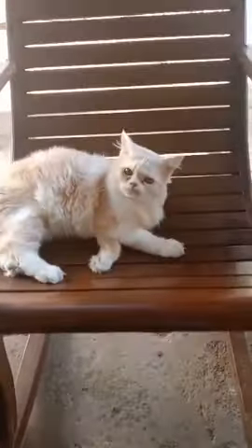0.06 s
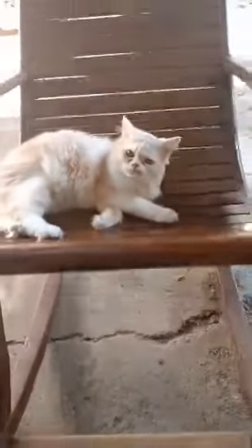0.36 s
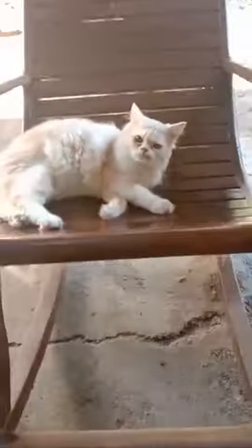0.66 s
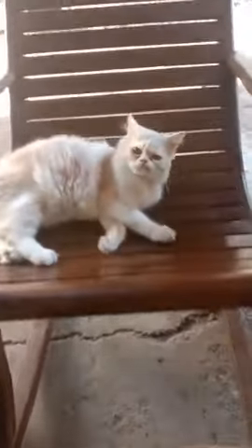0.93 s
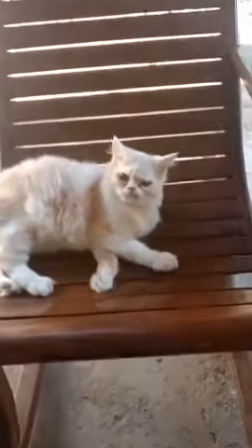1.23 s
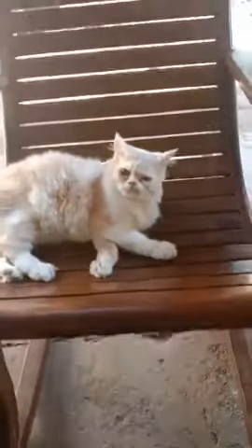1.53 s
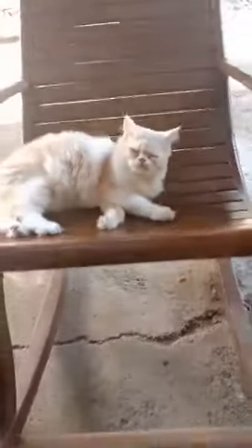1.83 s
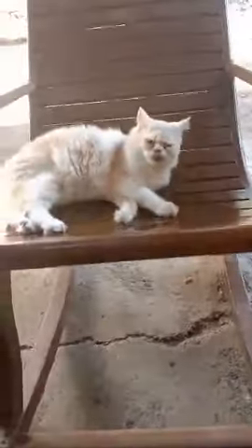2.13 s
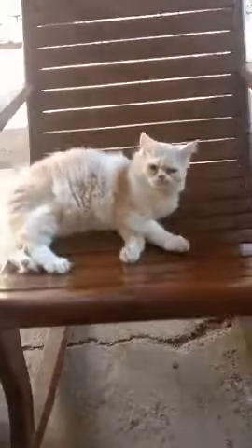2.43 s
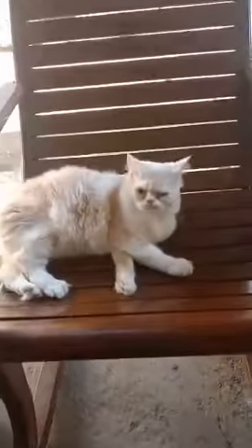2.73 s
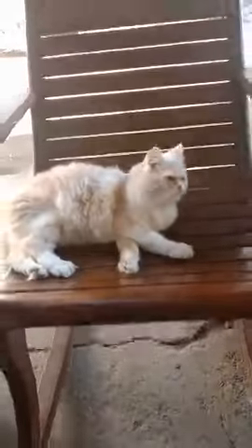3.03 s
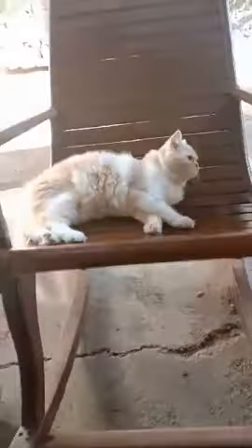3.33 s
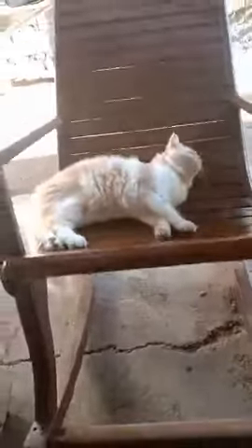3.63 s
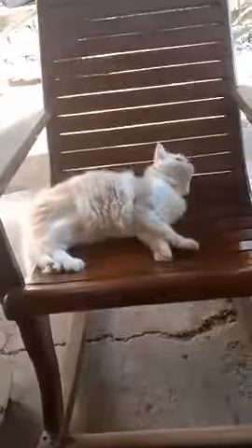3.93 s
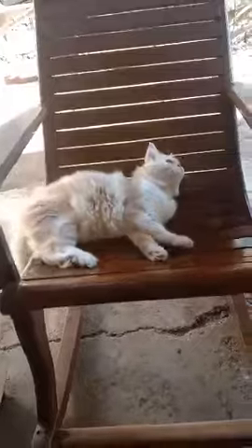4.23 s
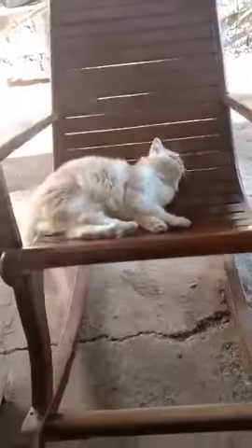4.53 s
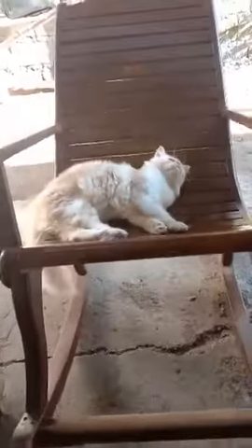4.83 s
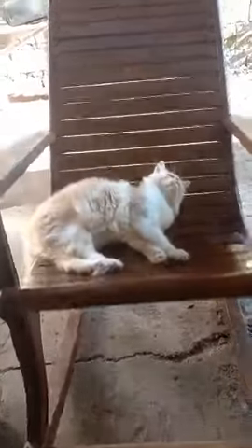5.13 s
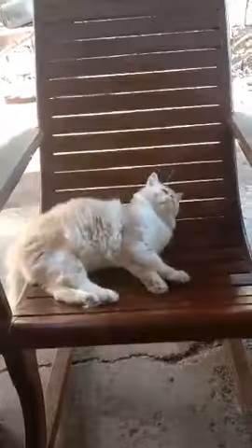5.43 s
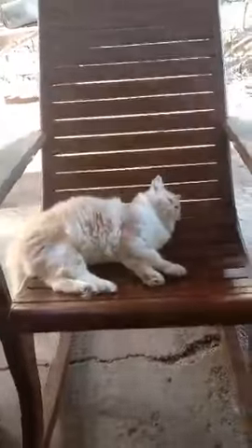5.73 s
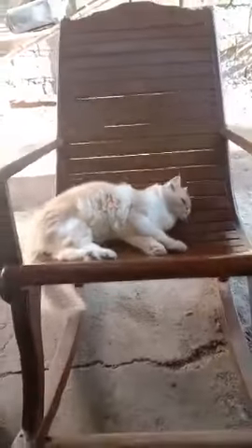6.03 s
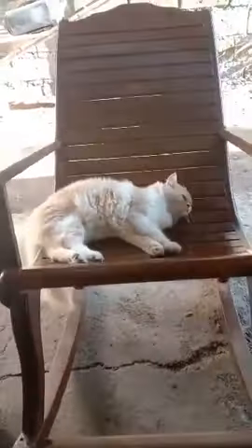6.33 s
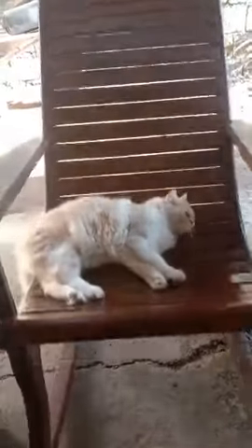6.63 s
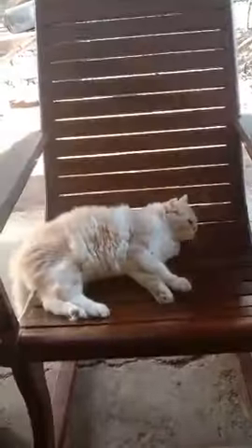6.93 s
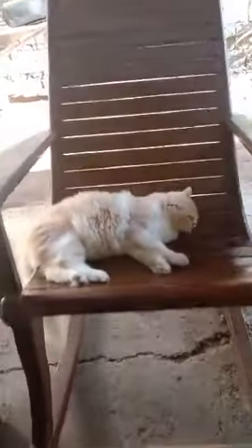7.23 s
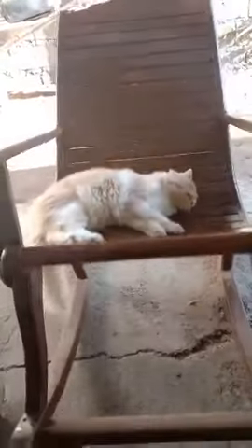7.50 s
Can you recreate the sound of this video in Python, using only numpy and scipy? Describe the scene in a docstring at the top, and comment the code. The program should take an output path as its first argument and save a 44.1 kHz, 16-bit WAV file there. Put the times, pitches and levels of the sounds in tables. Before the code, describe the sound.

A wooden rocking chair thumps and grinds softly on gritty concrete in a slow rhythm, while a small bird repeats a high falling chirp.

```python
"""A wooden rocking chair rocks close by on a gritty concrete porch, over a quiet outdoor hiss.
It swings out first: the runners tip over a flat spot, the frame thumps and sand grinds or cracks.
Then it rolls softly back. Among the six swings out, a high falling chirp, probably a small bird,
rings under the roof six times: four just before a thump, two shortly after one.
Faint tones come and go far behind, and toward the end a dry joint gives its two clearest creaks."""
import sys
import numpy as np
from scipy import signal
from scipy.fft import rfft, irfft, next_fast_len
from scipy.io import wavfile
from scipy.ndimage import map_coordinates

SR = 44100
rng = np.random.default_rng(int(sys.argv[2]) if len(sys.argv) > 2 else 0)


def wav_out(sig):
    """Save sig, one row per channel (or a flat mono array), as 16-bit PCM at SR to the path in sys.argv[1]."""
    wavfile.write(sys.argv[1], SR, np.round(np.clip(np.atleast_2d(sig).T, -1, 1) * 32767).astype(np.int16))


N = 342216
TREBLE_LIMIT_HZ = 13200

# Levels in the tables are relative: each function sets its own overall loudness.
# swings out: t/s, thump/dB, hardness/dB, grinding before, at and after the flat spot/dB
OUT_SWINGS = [(0.289, -32.5, -25, -15, -11.5, 3.5), (1.741, -26.5, -3, -3.5, -6, 3.5),
              (3.161, -23.5, -5, -7, 8, -2.5), (4.477, -35.5, -12, -18, 0.5, -2),
              (5.922, -25.5, -2.5, -9, 6.5, -8), (7.347, -26.5, -11.5, 2.5, -7.5, 1)]
# swings back: t/s, bump/dB, grinding before, at and after the flat spot/dB
BACK_SWINGS = [(1.045, -43, -1.5, -17, 2), (2.507, -44, -6, 5, -3), (3.958, -41, -11, 6, -12),
               (5.283, -47.5, -6, 7.5, 0.5), (6.663, -45, -10, -5, 3.5)]
# the frame's own notes: f/Hz, level/dB, time to fade by 60 dB/s
FRAME_NOTES = [(82.6, -5, 0.16), (125.7, -19, 0.42), (177.3, 0.5, 0.1), (190, 4, 0.085), (249, -2.5, 0.049),
               (335, -15, 0.3), (387, -36.5, 0.056), (480, -20, 0.21), (591, -20.5, 0.16),
               (690, -2.5, 0.053), (753.3, -6, 0.056), (835, -3.5, 0.047), (933, -18, 0.015),
               (1140, -6, 0.055), (1192, -19.5, 0.029)]
# sandy patches, out and back: t from the flat spot/s, rise/s, fall/s, level/dB, lows/dB, highs/dB
OUT_PATCHES = [(-0.033, 0.024, 0.099, -44, -7, -11.5), (0.035, 0.013, 0.1, -48, 1.5, -9.5),
               (0.133, 0.026, 0.08, -47.5, -4, -5.5)]
BACK_PATCHES = [(-0.1, 0.01, 0.094, -45.5, -2.5, -9), (-0.014, 0.034, 0.061, -46.5, -4.5, -11),
                (0.058, 0.021, 0.06, -47, -6, -5), (0.206, 0.022, 0.081, -43, -9, -7),
                (0.263, 0.022, 0.055, -53, -9.5, -10), (0.382, 0.039, 0.014, -67, -4.5, -6)]
# single short scratchy noises (at 0.787 and 4.85 s with a chirp): t/s, rise/s, fall/s, level/dB
SCRATCHES = [(0.608, 0.021, 0.15, -54.5), (0.787, 0.003, 0.12, -47.5), (1.111, 0.005, 0.077, -46),
             (2.053, 0.0027, 0.034, -57.5), (1.439, 0.0071, 0.025, -53), (2.096, 0.025, 0.042, -54.5),
             (2.263, 0.0091, 0.038, -67), (2.446, 0.01, 0.13, -67), (3.419, 0.0048, 0.022, -57.5),
             (3.53, 0.014, 0.017, -62.5), (3.885, 0.0036, 0.087, -45), (4.211, 0.031, 0.095, -53),
             (4.409, 0.031, 0.023, -57.5), (4.85, 0.021, 0.16, -47.5), (5.579, 0.025, 0.11, -52.5),
             (6.406, 0.004, 0.082, -55.5), (6.77, 0.013, 0.087, -57), (7.615, 0.061, 0.089, -44)]
# bursting grains: t/s, level/dB, highs/dB
GRAIN_CRACKS = [(0.4123, -38.5, -3.5), (1.004, -20, -24), (1.052, -22, -18), (1.0593, -35.5, -1),
                (1.8646, -24, -16.5), (2.4415, -8, -29.5), (2.4769, -20, -23.5), (3.2817, -23, -25.5),
                (3.881, -9, -26), (3.969, -22.5, -16.5), (5.2057, -18, -26.5), (5.247, -26, -24),
                (5.2688, -18, -25.5), (5.3006, -15.5, -21), (6.6305, -30.5, -16.5)]
# creaks of a joint: t/s, length/s, first f/Hz, last f/Hz, level/dB
JOINT_CREAKS = [(1.143, 0.014, 1700, 1663, -63), (1.476, 0.049, 810, 745, -88),
                (4.2, 0.046, 1013, 1010, -63.5), (5.478, 0.05, 1164, 1079, -49.5),
                (6.926, 0.042, 3400, 2760, -44)]
# chirps: t/s, level/dB, pitch factor, length factor
BIRD_CHIRPS = [(0.704, -32, 1.03, 0.86), (1.608, -39, 1, 0.92), (3.048, -33.5, 1.0, 1.084),
               (4.82, -32, 1.02, 1.013), (5.813, -33.5, 1.018, 1.01), (7.166, -31.5, 1.033, 1.08)]
# background tones: t/s, length/s, first f/Hz, last f/Hz, width/Hz, level/dB
FAINT_TONES = [(0.421, 0.28, 1172, 1050, 80, -75), (1.968, 0.074, 355, 297, 40, -75),
               (1.969, 0.091, 3320, 3280, 390, -68.5), (2.172, 0.11, 3530, 3270, 150, -72),
               (2.568, 0.057, 3440, 3250, 460, -55), (2.89, 0.041, 348, 308, 23, -76.5),
               (2.923, 0.05, 840, 768, 50, -74), (3.114, 0.025, 557, 566, 60, -54.5),
               (3.515, 0.63, 5260, 5160, 350, -71.5), (3.533, 0.72, 755, 790, 200, -76),
               (3.565, 0.059, 560, 564, 64, -70.5), (3.71, 0.25, 480, 260, 70, -74.5),
               (4.152, 0.13, 410, 452, 44.6, -70.5), (5.049, 0.62, 1106, 988, 130, -66.5),
               (5.382, 0.038, 535, 584, 62, -65), (5.622, 0.044, 365, 312, 33, -70),
               (6.035, 0.061, 312, 338, 19.3, -69), (6.056, 0.33, 857, 860, 84, -78),
               (6.293, 0.18, 1645, 1718, 173, -71.5), (7.034, 0.11, 1730, 1564, 150, -68.5),
               (7.098, 0.55, 1157, 1021, 130, -65.5)]
# loudness of the hiss: t/s, level/dB
HISS_LEVELS = [(0, 10.5), (0.198, -2), (0.8, 3), (1.55, -5.5), (2.05, 0), (2.329, 0), (3.05, -5), (3.65, 6),
               (4.4, 0), (5.101, 5.5), (5.75, -1.5), (6.5, -0.5), (6.999, 4)]
# echo of the porch: f/Hz, time to fade by 60 dB/s
PORCH_FADE = [(100, 0.32), (400, 0.36), (1200, 0.21), (5000, 0.093), (12000, 0.054)]
# tone colours, the strong and weak pitches of each sound: f/Hz, level/dB
ROLL_COLOUR = [(30, -23.5), (85, 18.5), (125, -8.5), (200, -1), (300, 4.5), (430, -12), (700, -19.5),
               (1200, -6), (2500, -36)]
GRIND_COLOUR = [(100, -0.5), (500, -16), (800, 1.5), (1200, 6.5), (2000, 5), (3300, -2), (5400, 4.5),
                (6500, -2.5), (8000, -5.5), (10500, -16.5), (12500, -13), (14000, -22)]
CRACK_COLOUR = [(100, -19), (800, -26), (1300, -3.5), (2200, -15), (3200, -5.5), (5000, -3), (7000, 5.5),
                (9000, 1.5), (13000, -6.5)]
CHIRP_COLOUR = [(3000, -10), (3700, -7), (4200, -7.5), (4700, 2), (5200, -3.5), (5900, 3.5), (6350, -16),
                (6800, -21.5), (8000, -3), (10000, -10)]
HISS_COLOUR = [(30, -22), (90, -8), (250, -17.5), (500, -7), (850, -8), (1600, -9.5), (2600, -13),
               (4000, -18.5), (5300, -8), (7000, -20.5), (9500, -14), (12000, -38.5)]
FLICKER_COLOUR = [(2400, -70), (3400, -32), (4200, -18), (6000, -12), (8000, -9), (13000, -11)]
RATTLE_COLOUR = [(30, -10), (90, -29), (180, -6), (330, 8.5), (1150, 6.5), (1600, -10), (4000, -30.5)]
RASP_COLOUR = [(500, 3), (1000, 2), (1800, 2.5), (3000, -9), (8000, 13), (10000, -0.5), (13000, -9.5)]
RUMBLE_COLOUR = [(30, -40.5), (60, -9.5), (88, 9), (130, -8.5), (200, -8), (330, -15), (600, -53),
                 (2000, -53.5)]
FRAME_COLOUR = [(30, -13), (60, -5), (110, 2)]  # so small a frame gives off little deep bass


def thumps(rattle_db=-12, rattle_fade_s=0.25, rise_s=0.011):
    """A runner tips over a flat spot: the frame rings and its joints rattle briefly."""
    out, t = np.zeros(N), np.arange(SR // 2) / SR
    hz, note_db, fade_s = np.transpose(FRAME_NOTES)[:, :, None]
    for start, db, hardness, *_ in OUT_SWINGS:
        detune, uneven_db, phase = rng.standard_normal((3, len(FRAME_NOTES), 1))
        bright_db = np.interp(hz, [250, 650], [0, 1]) * (hardness + 6)  # hard blows sound brighter
        waves = np.sin(2 * np.pi * (hz * (1 + 0.012 * detune) * t + phase))
        notes = waves * gain(note_db + bright_db + uneven_db - 60 * t / fade_s)
        rattle = noise(len(t), RATTLE_COLOUR) * gain(rattle_db - 60 * t / rattle_fade_s)
        blow = (notes.sum(0) + rattle) * (1 - np.exp(-t / rise_s))
        add(out, start, gain(db - 9) * blow / blow[:SR // 25].std())
    return out


def rolls(rise_s=0.019):
    """Swinging back, the runners bump gently over the uneven floor: a dull woody murmur."""
    out, t = np.zeros(N), np.arange(SR // 4) / SR
    swell = t / rise_s * np.exp(1 - t / rise_s)
    for start, db, *_ in BACK_SWINGS:
        add(out, start, gain(db) * noise(len(t), ROLL_COLOUR) * swell)
    return out


def scrapes(grains_per_s=1550, spread_db=4):
    """Sand under a runner makes tiny slips that ring in the wood; the single scratches sound alike."""
    out, t = np.zeros(N), np.arange(SR // 3) / SR
    for start, rise, fall, db, lows, highs in scrape_list():
        signs = rng.choice([-1, 1], len(t))
        sizes = gain(spread_db * np.minimum(rng.exponential(1, len(t)), 4))
        slipping = rng.random(len(t)) < grains_per_s / SR
        pressure = gain(np.where(t < rise, -11 * (1 - t / rise), -24 * (t - rise) / fall))
        pressure *= np.minimum(t / 0.005, 1)
        slips = normalise(signs * sizes * slipping) * pressure
        wood = rolling_contact(signal.fftconvolve(slips, wood_ring(fade_s=0.025)))
        tilt = [(2200, lows + 2), (3200, 0.037), (6300, 0.064), (7800, highs + 5)]
        add(out, start, gain(db + 8.5) * colour(wood, tilt))
    return colour(out, GRIND_COLOUR)


def scrape_list(scratch_lows_db=-5.5, scratch_highs_db=-5.5):
    """Lists the single scratches, then the sand each swing crosses, pressed by the shifting weight."""
    rows = [(*row, scratch_lows_db, scratch_highs_db) for row in SCRATCHES]
    for swings, patches in (OUT_SWINGS, OUT_PATCHES), (BACK_SWINGS, BACK_PATCHES):
        for start, *_, before, at, after in swings:
            for delay, rise, fall, db, lows, highs in patches:
                weight_db = np.interp(delay, [-0.017, 0, 0.14], [before, at, after])
                rows.append((start + delay, rise, fall, db + weight_db, lows, highs))
    return rows


def rolling_contact(x, ripple_db=5, spacing_hz=170, sink_per_s=0.35):
    """Each spot on a runner favours its own pitches, which sink as the touching point moves along."""
    hz, t = np.arange(0, SR / 2, spacing_hz), np.arange(len(x)) / SR
    peaks = normalise(gain(ripple_db * np.clip(rng.standard_normal(512)[:len(hz)], -2, 2)))
    wood = colour(x, np.c_[hz, 20 * np.log10(peaks)])
    slowing_time = t - sink_per_s * t ** 2 / 2
    return map_coordinates(wood, [SR * slowing_time], order=3)


def wood_ring(fade_s, size=4096):
    """Struck wood rings at so many pitches at once that it sounds like fading noise."""
    ring = rng.standard_normal(size) * gain(-60 * np.arange(size) / SR / fade_s)
    return ring / np.linalg.norm(ring)


def cracks():
    """A larger grain bursts: a hard snap and a short ring of the runner."""
    out = np.zeros(N)
    for start, db, highs in GRAIN_CRACKS:
        snap = wood_ring(fade_s=0.035) + gain(-6) * wood_ring(fade_s=0.29)
        add(out, start, gain(db + 14) * colour(snap, [(4500, 0.022), (8500, highs + 6)]))
    return colour(out, CRACK_COLOUR)


def creaks():
    """A dry joint sticks and slips almost regularly, making a short note rich in overtones."""
    out = np.zeros(N)
    for start, length, first_hz, last_hz, db in JOINT_CREAKS:
        size = int(length * SR)
        hz = np.linspace(first_hz, last_hz, size) * (1 + 0.014 * wobble(size, 900))
        phase = 2 * np.pi * np.cumsum(hz) / SR
        slips = sum(np.cos(k * phase) for k in range(1, int(TREBLE_LIMIT_HZ / first_hz) + 1))
        wood = normalise(colour(slips, GRIND_COLOUR))
        add(out, start, gain(db) * wood * signal.windows.tukey(size, 0.8))
    return out


def chirps(ring_hz=4780, ring_rise_s=0.044, ring_fade_s=0.19):
    """Two voices fall together and leave a blurred ring; a faint rasp sounds with them."""
    out, hush = np.zeros((2, N))
    t = np.arange(SR // 3) / SR
    ring_shape = np.minimum(t / ring_rise_s, 1)
    ring_shape *= gain(-4 - 60 * np.maximum(t - ring_rise_s, 0) / ring_fade_s)
    for start, db, pitch, stretch in BIRD_CHIRPS:
        call, top_hz = np.zeros(N), pitch * 8584
        upper = whistle(top_hz, stretch, hold=0.048)
        lower = whistle(0.81 * top_hz, stretch, hold=0.004)
        add(call, 0, upper + gain(-5.5) * lower)
        add(call, 0.06 * stretch, ring_shape * blurred(pitch * ring_hz * t, width_hz=670))
        # each call takes its own paths under the roof
        call = colour(porch(call, echo_db=3)[:SR], CHIRP_COLOUR)
        add(out, start, gain(db) * call / call[:SR // 7].std())
        # each chirp ends in a soft band of noise that falls in pitch
        add(hush, start + 0.145, gain(db - 23) * fuzzy_glide(0.13, 3800, 2200, width_hz=1000))
    rasp = colour(out * rng.standard_normal(N), RASP_COLOUR)
    return out + gain(-30) * rasp + hush


def whistle(top_hz, stretch, hold, rise=0.036, fall_rate=13, hoarseness=0.045):
    """One hoarse tone falls steadily as it swells, holds and dies; a larger stretch slows it all."""
    t = np.arange(SR // 5) / SR / stretch
    hz = top_hz * 2 ** (-fall_rate * t) * (1 + hoarseness * wobble(len(t), 1500))
    shape_db = -1095.5 * np.maximum(rise - t, 0) - 601 * np.maximum(t - rise - hold, 0)
    flutter_db = wobble(len(t), 500)
    return gain(shape_db - flutter_db) * np.sin(2 * np.pi * np.cumsum(hz) / SR)


def porch(x, echo_db, gap_s=0.004):
    """Adds the many echoes from floor, walls and roof; the high pitches die first."""
    echoes = rng.standard_normal(SR) * (rng.random(SR) < 0.12) * (np.arange(SR) > gap_s * SR)
    hz, t, bands = signal.stft(echoes, SR, nperseg=256)
    fade = gain(-60 * t / look_up(PORCH_FADE, hz)[:, None])
    tail = signal.istft(bands * fade, SR, nperseg=256)[1]
    return x + gain(echo_db) * signal.fftconvolve(x, tail / np.linalg.norm(tail))[:N]


def tones():
    """Faint fuzzy tones come and go in the background."""
    out = np.zeros(N)
    for start, *glide, db in FAINT_TONES:
        add(out, start, gain(db - 3) * fuzzy_glide(*glide))
    return out


def air():
    """Quiet outdoor hiss over a low, uneven rumble."""
    hiss_db = -77.5 + 1.5 * wobble(N, 6) + np.interp(np.arange(N) / SR, *np.transpose(HISS_LEVELS))
    rumble_db = -77 + 5.5 * wobble(N, 8)
    return noise(N, HISS_COLOUR) * gain(hiss_db) + noise(N, RUMBLE_COLOUR) * gain(rumble_db)


def fuzzy_glide(length, first_hz, last_hz, width_hz):
    """A blurred tone that slides in pitch while it swells and fades."""
    size = int(length * SR)
    cycles = np.cumsum(np.linspace(first_hz, last_hz, size)) / SR
    return blurred(cycles, width_hz) * signal.windows.tukey(size, 0.5)


def blurred(cycles, width_hz):
    """Shakes a tone at random, smearing it into a narrow band of noise."""
    blur = wobble(len(cycles), 2 * width_hz) + 1j * wobble(len(cycles), 2 * width_hz)
    return normalise((blur * np.exp(2j * np.pi * cycles)).real)


def wobble(size, hz):
    """Wanders to a new random value hz times a second, for up to 4096 values."""
    return np.interp(np.arange(size) * hz / SR, np.arange(4096), rng.standard_normal(4096))


def noise(size, points):
    """Steady noise with the given tone colour."""
    return normalise(colour(rng.standard_normal(size), points))


def colour(x, points):
    """Turns each pitch up or down by a table of f/Hz, level/dB."""
    size = next_fast_len(len(x) + 2048)
    db = look_up(points, np.fft.rfftfreq(size, 1 / SR))
    return irfft(rfft(x, size) * gain(db), size)[:len(x)]


def look_up(points, hz):
    """Reads between a table's rows along a scale of musical pitch."""
    row_hz, values = np.transpose(points)
    return np.interp(np.log(hz + 1), np.log(row_hz + 1), values)


def gain(db):
    """Turns decibels into a multiplier."""
    return 10 ** (np.asarray(db) / 20)


def normalise(x):
    """Scales a signal to an average strength (rms) of 1."""
    return x / np.sqrt(np.mean(x ** 2) + 1e-20)


def add(mix, start_s, sound):
    """Adds a sound to the mix at the given time."""
    part = mix[max(round(start_s * SR), 0):][:len(sound)]
    part += sound[:len(part)]


def scene():
    """The chair is near and the chirp farther off; only the treble flickers between left and right."""
    chair = porch(colour(thumps() + rolls(), FRAME_COLOUR), echo_db=-16.5)
    chair += porch(scrapes() + creaks(), echo_db=-9.5)
    chair += porch(cracks(), echo_db=-8)
    centre = chair + chirps() + porch(tones(), echo_db=4.5)
    flicker = colour(centre * wobble(N, 300), FLICKER_COLOUR)
    return np.array([centre + flicker, centre - flicker]) + air()


def record(dry):
    """Cuts away the very highest treble."""
    low_pass = signal.firwin(255, TREBLE_LIMIT_HZ, window=("kaiser", 8), fs=SR)
    return signal.oaconvolve(dry, low_pass[None], "same")


dry = scene()
out = record(dry)
wav_out(out)
```